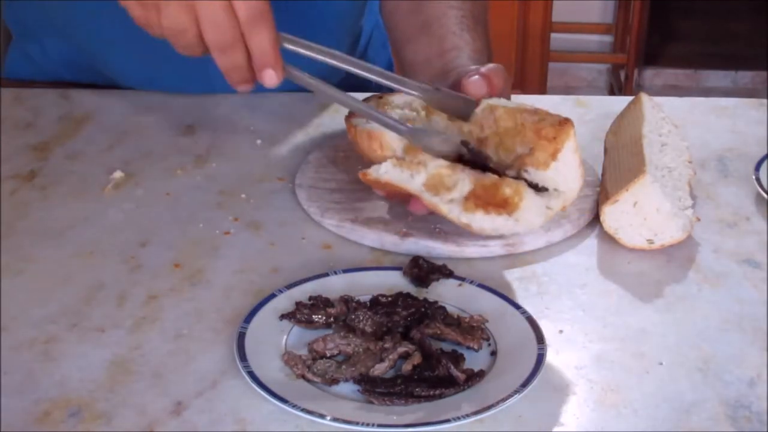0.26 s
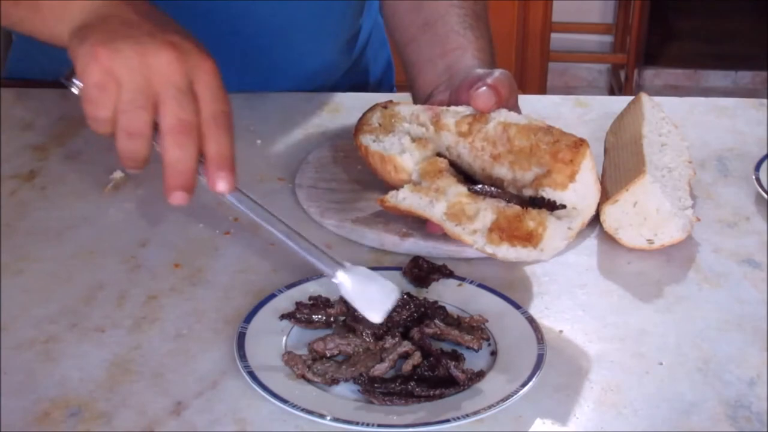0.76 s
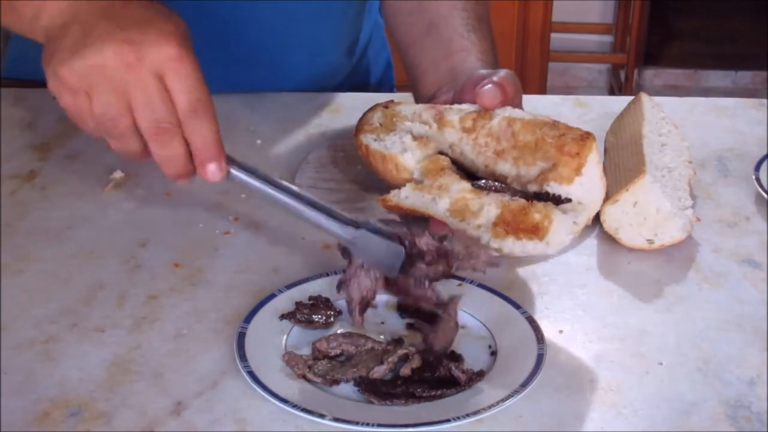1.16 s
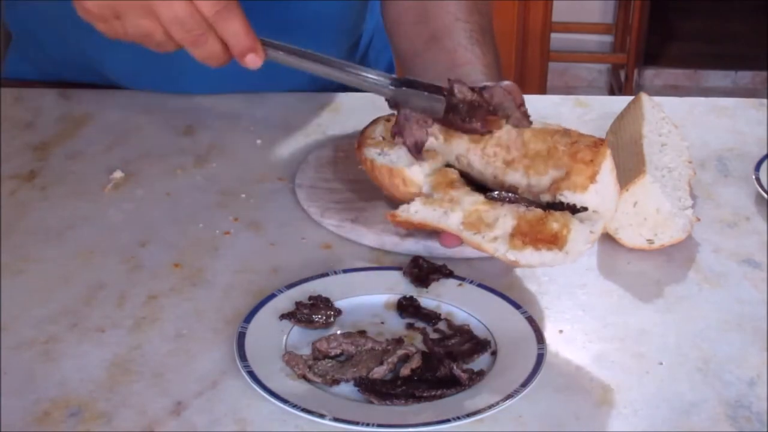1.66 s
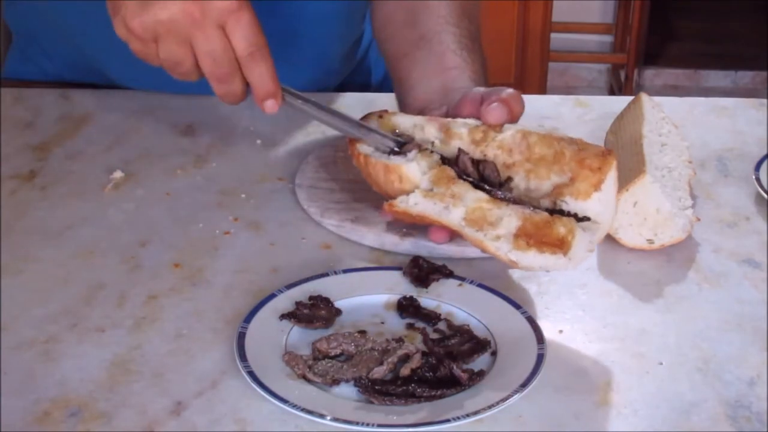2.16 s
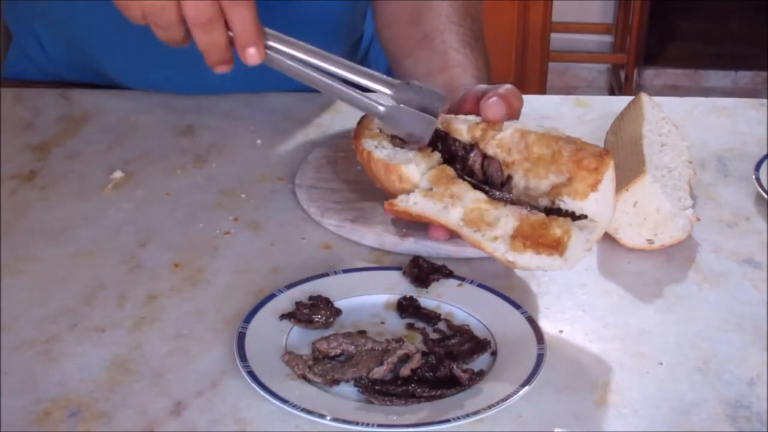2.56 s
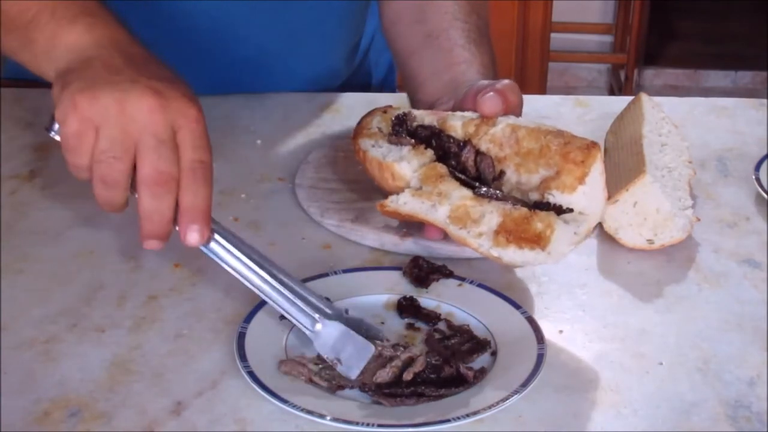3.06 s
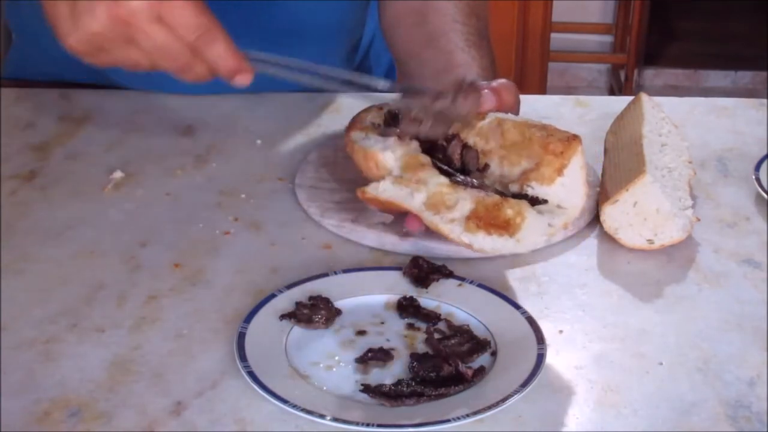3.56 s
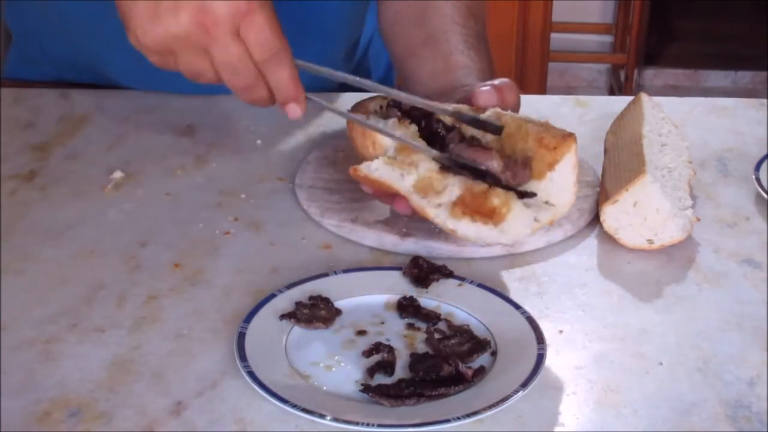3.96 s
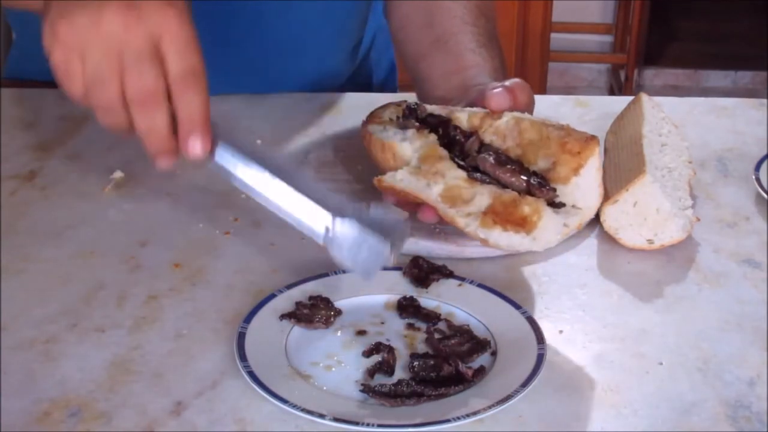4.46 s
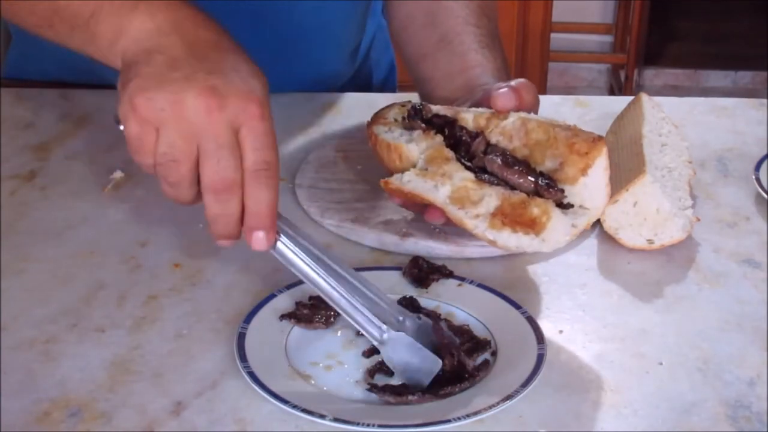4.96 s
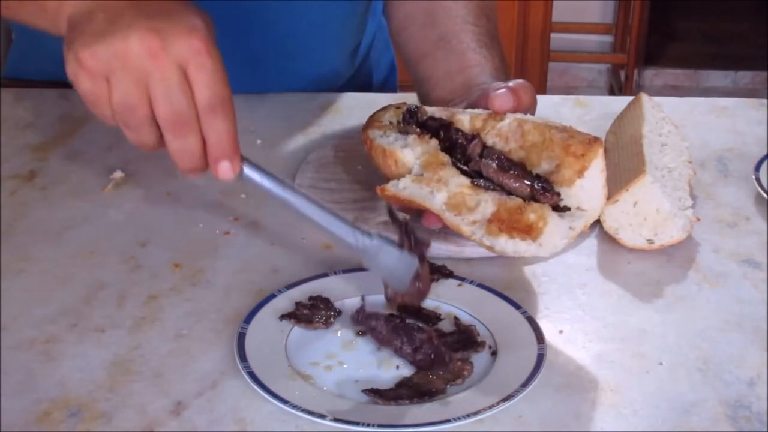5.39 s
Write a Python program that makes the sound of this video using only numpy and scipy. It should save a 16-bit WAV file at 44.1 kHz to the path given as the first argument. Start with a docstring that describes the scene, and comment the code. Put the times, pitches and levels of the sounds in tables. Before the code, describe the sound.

A quiet, hard-walled kitchen, heard close: a faint, slightly wavering appliance hum near 100 Hz and soft still air run throughout. From 0.15 to 0.4 s, tiny steel ticks accompany a soft grainy press into a bread roll. At 0.86 s the tongs clack shut, crisp and metallic, with a few quick weaker repeats, then very faint plate touches through meat at 1.15-1.3 s. Around 2.1-2.4 s comes a gentle crumb rustle with dull, barely audible knocks; thin ticks follow at 2.5 and 2.65 s. At 3.02 s the tongs strike the ceramic plate, the loudest moment: a bright, dense clatter juddering briefly, a tiny scrape, then from 3.18 s quickening, weakening tocks as the plate settles by 3.3 s. The short room tail fades. Near 4.1-4.25 s there are soft ticks, knocks and a brief press; faint plate touches at 5.0-5.17 s and last ticks at 5.3-5.4 s.

```python
"""First a hum and still air, a soft press into a bread roll and light ticks of steel tongs.
In a hard-walled kitchen the tongs clack shut, then strike a ceramic plate as meat is served.
Plate and tongs ring as dying sines over a noisy clack; after the strike the plate rocks to rest.
Ticks, knocks and touches are short rings and noises; presses and a scrape are swelling noise.
An appliance hums throughout as a few wavering tones."""
import sys
import numpy as np
from scipy import signal
from scipy.fft import rfft, irfft, next_fast_len
from scipy.io import wavfile
from scipy.ndimage import uniform_filter1d, map_coordinates

SR = 44100
rng = np.random.default_rng(int(sys.argv[2]) if len(sys.argv) > 2 else 0)


def dump_mix(stems):
    """Bounce the given channels to the path in sys.argv[1] as a 16-bit WAV at rate SR."""
    frames = np.atleast_2d(stems).T  # one column per channel
    limited = np.clip(frames, -1, 1)  # hard clip at full scale
    pcm = np.round(limited * 32767).astype(np.int16)
    wavfile.write(sys.argv[1], SR, pcm)


N = 248283
TIME = np.arange(N) / SR
RING_TIME = TIME[:SR * 2 // 5]  # the 0.4 s given to one short sound


# clacks of the tongs, alone or on the plate:
# (time [s], plate level [dB], tongs level [dB], clack level [dB], contact bandwidth [Hz])
TONGS_CLACKS = [(0.863, -41, -19.5, -20.5, 19000), (0.876, -43, -32, -30, 8000),
                (0.896, -50, -34.5, -33, 9000), (0.923, -56, -34.5, -39, 3380),
                (3.019, -19.5, -19, -17.5, 19000), (3.0234, -24.5, -19, -17.5, 4100),
                (3.035, -26.5, -31, -22.5, 17200), (3.053, -33, -44, -31, 17000),
                (3.07, -44, -29.5, -34, 6000), (3.126, -38, -33, -44, 3000)]


def clacks():
    """The tongs clack shut, then strike the plate; the plate's share of the ring differs each time."""
    out = np.zeros(N)
    for s, plate_db, tongs_db, clack_db, contact_hz in TONGS_CLACKS:
        add(out, s, contact(plate_db, tongs_db, clack_db, contact_hz))
    return out


# ring of the ceramic plate: (pitch [Hz], relative level [dB], time to fall 60 dB [s])
PLATE_RING = [(313, -24, .22), (1208, -9, .2), (1244, -10, .18), (1380, -19, .35), (1846, -11, .2),
              (2353, -12, .33), (2405, -9, .27), (2577, -3, .12), (2830, -3, .11), (2895, -5, .09),
              (3452, -5, .19), (3530, -9, .1), (3599, -6, .12), (4585, -20, .22), (5290, -15, .28),
              (5456, -10, .13), (6008, -7, .11), (6072, -3.5, .19), (6135, -13, .3), (6237, -6.5, .17),
              (6800, -12, .25), (6900, -10, .1), (7025, -6, .12), (8150, -13, .1), (8352, -9, .12),
              (8428, -6, .19), (8811, -7, .15), (8912, -8, .12), (8969, -6, .14), (9850, -10, .1),
              (11450, -9, .1), (11860, -16, .16), (12947, -12, .12), (13423, -7, .11), (13725, -10, .1),
              (13950, -5, .11), (14869, -14, .08)]
# ring of the steel arms: (pitch [Hz], relative level [dB], time to fall 60 dB [s])
TONGS_RING = [(271, -24, .2), (1225, -19, .14), (1345, -15, .14), (1580, -19, .15), (2116, -4, .15),
              (2204, -10, .15), (2275, -11, .12), (2302, -7, .26), (2805, -8, .13), (3690, -4, .17),
              (3742, -4, .17), (3830, -11, .12), (4485, -14, .12), (5262, -16, .14), (5345, -17, .22),
              (6202, -16, .12), (6554, -13, .11), (6955, -7, .08), (7049, -10, .12), (7590, -19, .11),
              (8420, -16, .12), (8495, -17, .18), (9450, -12, .1), (9960, -14, .09), (10078, -17, .1),
              (10218, -13, .1), (10562, -16, .11), (11900, -19, .1), (13330, -18, .1), (13509, -15, .1),
              (13604, -14, .1), (14480, -16, .09)]
# colour of the dense, quickly dying part of a clack: (pitch [Hz], relative level [dB per Hz])
CLACK_COLOUR = [(30, -60), (150, -46), (280, -28), (450, -1.5), (700, -6), (950, -5.5), (1350, 6),
                (1750, 1), (2000, 1), (2250, 18), (2500, 2), (2830, 11), (3150, -1), (3700, 11),
                (4200, -11), (5300, 3.5), (5900, 5.5), (6900, 9.5), (7900, -4), (9300, 5.5), (11000, -3.5),
                (12300, -3), (13500, 2), (15000, -4)]


def contact(plate_db, tongs_db, clack_db, contact_hz, clack_t60=0.095, grain_db=2.0, grain_per_s=450):
    """Plate and tongs both ring over a dense, crackly clack; a cushioned contact loses the treble."""
    grain = from_db(grain_db * drift(grain_per_s, RING_TIME))
    clack = from_db(clack_db) * noise(CLACK_COLOUR, len(RING_TIME)) * grain * decay(clack_t60)
    # stay safely below the highest pitch the sample rate allows
    cushion = signal.butter(2, min(contact_hz, SR * 9 / 20), fs=SR, output="sos")
    ringing = ring(PLATE_RING, plate_db) + ring(TONGS_RING, tongs_db)
    return signal.sosfilt(cushion, ringing + clack)


# low thud under each main clack: (time [s], level before rise and fade [dB])
LOW_THUDS = [(0.863, -37), (3.019, -32)]
# colour of the low thud: (pitch [Hz], relative level [dB per Hz])
THUD_COLOUR = [(120, -46), (250, -7), (310, 3), (400, -6), (680, 12), (1000, -14), (2000, -35)]
THUD_RISE_S, THUD_T60_S = 0.023, 0.25


def thuds():
    """A low noise under each main clack swells after it, then dies."""
    out = np.zeros(N)
    envelope = (1 - np.exp(-RING_TIME / THUD_RISE_S)) * decay(THUD_T60_S)
    for s, db in LOW_THUDS:
        add(out, s, from_db(db) * noise(THUD_COLOUR, len(RING_TIME)) * envelope)
    return out


# the skid after the tongs strike the plate; the slips come at random, SKID_PER_S a second on average
SKID_S, SKID_HELD_S, SKID_DB, SKID_FALL_DB_PER_S = 3.027, 0.085, -25, 152
SKID_PER_S, SKID_SPREAD_DB, SKID_CLACK_T60_S = 240, 13, 0.012


def skid():
    """The tips judder over the glaze: uneven small clacks that grow weaker."""
    size = len(RING_TIME)
    held = RING_TIME < SKID_HELD_S
    happens = rng.random(size) < SKID_PER_S / SR
    uneven = from_db(SKID_SPREAD_DB * rng.uniform(-1.2, 1, size))
    weakening = from_db(SKID_DB - SKID_FALL_DB_PER_S * RING_TIME)
    clack = noise(CLACK_COLOUR, size) * decay(SKID_CLACK_T60_S)
    out = np.zeros(N)
    add(out, SKID_S, signal.fftconvolve(happens * held * uneven * weakening, clack))
    return out


# tock of the plate's foot: (pitch [Hz], relative level [dB], time to fall 60 dB [s])
FOOT_RING = [(1240, -20.5, 0.19), (1380, -9.5, 0.047), (1500, -23, 0.24), (2386, 3, 0.045)]
# first fall of the foot, its level, first gap, each gap over the last, loss each time
ROCK_S, ROCK_DB, ROCK_GAP_S, ROCK_QUICKENING, ROCK_LOSS_DB = 3.182, -22, 0.051, 0.65, 10
# ring and clack against the tock; contact bandwidth
ROCK_RING_DB, ROCK_CLACK_DB, ROCK_HZ = -21, -10.5, 3540
ROCK_ATTACK_S = 0.0011


def rocking():
    """The tipped plate drops and rocks to rest; its foot tocks and it rings; returns (ring, tocks)."""
    rings, tocks = np.zeros((2, N))
    for delay, fade_db in bounces(ROCK_GAP_S, ROCK_QUICKENING, ROCK_LOSS_DB, count=4):
        db = ROCK_DB + fade_db
        # the tongs stay silent here
        add(rings, ROCK_S + delay, contact(db + ROCK_RING_DB, -np.inf, db + ROCK_CLACK_DB, ROCK_HZ))
        add(tocks, ROCK_S + delay, ring(FOOT_RING, db) * (1 - np.exp(-RING_TIME / ROCK_ATTACK_S)))
    return rings, tocks


def bounces(gap_s, ratio, loss_db, count):
    """A run of contacts as (delay s, dB): each gap is `ratio` times the last, each contact weaker."""
    return [(gap_s * np.sum(ratio ** np.arange(k)), -loss_db * k) for k in range(count)]


# tips reach the plate through the meat:
# (time [s], level at the main pitch [dB], main pitch [Hz], loss one octave away [dB])
PLATE_TOUCHES = [(1.144, -52, 2280, 28), (1.196, -51, 2300, 30), (1.197, -42, 4600, 220),
                 (1.198, -55.5, 7500, 14), (1.322, -49, 3000, 6), (5.005, -58.5, 2300, 23),
                 (5.166, -40.5, 4840, 220), (5.171, -52, 3000, 13)]


def touches(lasting_db=5.0, usual_t60=0.2):
    """A cushioned touch wakes the plate's longest modes, mostly near one pitch."""
    out = np.zeros(N)
    hz, _, t60 = np.transpose(PLATE_RING)
    favour_db = lasting_db * np.log2(t60 / usual_t60)
    for s, db, main_hz, focus_db in PLATE_TOUCHES:
        loss_db = focus_db * np.log2(hz / main_hz) ** 2
        add(out, s, ring(PLATE_RING, db + favour_db - loss_db))
    return out


# where the scrape sings: (pitch [Hz], width [Hz], relative level [dB])
SCRAPE_RESONANCES = [(1394, 130, -2), (3800, 130, -2), (4610, 130, 1), (6500, 700, -5), (12900, 3000, -14)]
SCRAPE_S, SCRAPE_HELD_S, SCRAPE_DB = 3.155, 0.043, -49
SCRAPE_RISE_DB_PER_S, SCRAPE_FALL_DB_PER_S = 500, 350


def scrape():
    """A steel tip slides over the glaze: friction noise sings in a few resonances."""
    out = 0
    for hz, width_hz, db in SCRAPE_RESONANCES:
        edges = [hz - width_hz / 2, hz + width_hz / 2]
        band = signal.butter(2, edges, "band", fs=SR, output="sos")
        out = out + from_db(db) * rms_one(signal.sosfilt(band, rng.standard_normal(N)))
    return out * swell(SCRAPE_S, SCRAPE_HELD_S, SCRAPE_DB, SCRAPE_RISE_DB_PER_S, SCRAPE_FALL_DB_PER_S)


# arms flexing at the hinge:
# (time [s], level [dB], main pitch [Hz], thin top relative to that level [dB])
HINGE_TICKS = [(.15, -60, 3300, -15), (.215, -54, 3400, -15), (.229, -55, 7800, -12),
               (.318, -55.5, 5600, 3), (.355, -54, 4900, 2), (.376, -58, 5040, 7.5), (.989, -47, 8000, 6),
               (2.476, -56, 11000, -2), (2.493, -52.5, 9360, -1), (2.651, -52.5, 8300, -9),
               (2.672, -50.5, 7000, -3), (4.103, -54, 4800, -4), (4.178, -55, 4300, 2.5),
               (5.296, -52, 8600, -13), (5.388, -58, 9000, -6)]
TICK_TOP_HZ = 12800  # every tick also has a thin top


def ticks():
    """The hinge ticks as the grip changes."""
    out = np.zeros(N)
    for s, db, main_hz, top_db in HINGE_TICKS:
        add(out, s, tick(db, main_hz) + tick(db + top_db, TICK_TOP_HZ))
    return out


# ring of the hinge end of the tongs:
# (pitch [Hz], relative level [dB], time to fall 60 dB [s])
HINGE_RING = [(2630, -4, .15), (3714, -5, .26), (5120, -1, 0.15), (6560, 0.5, .08), (7600, -2, .05),
              (8300, -1, 0.096), (8600, -7, 0.066), (10050, -21, .045), (12950, -4, .07), (13450, -7, .063)]


def tick(db, main_hz, focus_db=20.0, snap_db=-2.5, snap_t60=0.06, rise_s=0.0022):
    """A gritty slip wakes thin steel; modes fade with their distance in octaves from the main pitch."""
    octaves = np.log2(np.array(HINGE_RING)[:, 0] / main_hz)
    snap = from_db(db + snap_db) * band_noise(main_hz, skirt_db=-8.0) * decay(snap_t60)
    # the table's level column is added inside ring()
    steel = ring(HINGE_RING, db - focus_db * octaves ** 2, flutter=0.6)
    return (snap + steel) * (1 - np.exp(-RING_TIME / rise_s))


# dull knocks: the plate wobbling on the table, the roll pressed, perhaps a wooden board:
# (time [s], level before the room mix [dB], pitch [Hz])
DULL_KNOCKS = [(2.237, -50.5, 294), (2.332, -54.5, 328), (3.032, -36, 682), (3.054, -29, 1130),
               (3.073, -40.5, 610), (3.131, -40, 1205), (3.133, -46.5, 684), (3.205, -42, 1450),
               (3.245, -50, 1350), (4.181, -48.5, 1330), (4.211, -50, 262), (4.215, -52, 1400),
               (4.25, -52, 847)]
KNOCK_CYCLES, KNOCK_ROUGHNESS = 66, 0.26  # cycles to fall 60 dB; 0 is a clean tone, 1 all noise


def knocks():
    """Dull knocks, the lower the longer."""
    out = np.zeros(N)
    for s, db, hz in DULL_KNOCKS:
        add(out, s, resonance(db, hz, KNOCK_CYCLES / hz, KNOCK_ROUGHNESS))
    return out


def resonance(db, hz, t60, roughness):
    """One heavily damped resonance: a clean tone when hard, a rough thud when soft."""
    rough = np.clip(roughness, 0, 1)
    tone = np.sqrt(2 - 2 * rough ** 2) * np.sin(2 * np.pi * hz * RING_TIME)
    thud = rough * band_noise(hz, skirt_db=-15.0)
    return from_db(db) * (tone + thud) * decay(t60)


# meat is pushed into the crumb: (time [s], held for [s], level [dB])
CRUMB_PUSHES = [(.14, 0.16, -59), (2.13, 0.23, -56), (4.17, 0.052, -55.5)]
# colour of the soft rubbing hiss: (pitch [Hz], relative level [dB per Hz])
RUBBING_COLOUR = [(150, -12), (300, 10), (700, -3.5), (1500, -3.5), (2800, -4), (4000, -8.5), (5000, -9.5),
                  (14000, -21.5)]
PUSH_RISE_DB_PER_S, PUSH_FALL_DB_PER_S = 62, 82


def rubbing(grain_db=1.0):
    """Each push swells, holds and fades; crumbs catch and let go, so the soft hiss is grainy."""
    pressure = sum(swell(s, held, db, PUSH_RISE_DB_PER_S, PUSH_FALL_DB_PER_S)
                   for s, held, db in CRUMB_PUSHES)
    return pressure * from_db(grain_db * drift(120)) * noise(RUBBING_COLOUR, N)


# appliance motor and mains: (pitch [Hz], typical level [dB rms], spread of the pitch waver [Hz])
HUM_TONES = [(98.5, -59, 0.38), (95.4, -72.5, 0.93), (194.5, -73, 1.82), (357.3, -68, 3.94),
             (541.4, -62, 2.25), (640, -72.5, 1.41)]


def hum(throb_db=2.0):
    """Steady tones wander a little in pitch and level; the two lowest lie close enough to beat."""
    out = np.zeros(N)
    for hz, db, waver_hz in HUM_TONES:
        turns = np.cumsum(hz + waver_hz * drift(14)) / SR + rng.random()
        level = np.sqrt(2) * from_db(db + throb_db * drift(4.806))  # a sine's peak is root 2 times its rms
        out += level * np.sin(2 * np.pi * turns)
    return out


# colour of the still air: (pitch [Hz], relative level [dB per Hz])
AIR_COLOUR = [(25, -13), (45, -15), (70, -13), (110, -5), (160, -9.5), (300, -5.5), (480, -8.5), (650, -7),
              (1100, -11), (2000, -15), (4000, -19.5), (9800, -22), (15000, -30.5)]
AIR_DB = -54.5  # rms


def still_air():
    """A steady, soft noise, strongest in the low range."""
    return from_db(AIR_DB) * noise(AIR_COLOUR, N)


def from_db(db):
    """Decibels to gain."""
    return 10 ** (np.asarray(db) / 20)


def rms_one(x):
    """Scale to unit power."""
    return x / np.sqrt(np.mean(x ** 2) + 1e-20)


def at_hz(points, hz):
    """Read a table along log frequency."""
    known_hz, values = np.transpose(points)
    return np.interp(np.log(np.maximum(hz, 1)), np.log(known_hz), values)


def noise(spectrum, size):
    """Noise of a given colour, rms 1."""
    fast_size = next_fast_len(size)
    gain = from_db(at_hz(spectrum, np.fft.rfftfreq(fast_size, 1 / SR)))
    white = rfft(rng.standard_normal(fast_size))
    return rms_one(irfft(white * gain, fast_size)[:size])


def band_noise(hz, skirt_db):
    """Short noise that peaks at one pitch and changes by skirt_db an octave, up to three octaves away."""
    return noise([(hz / 8, 3 * skirt_db), (hz, 0), (hz * 8, 3 * skirt_db)], len(RING_TIME))


def drift(rate, time=TIME):
    """Smooth chance with a spread of about 1 that changes `rate` times a second."""
    return map_coordinates(rng.standard_normal(1024), [time * rate], order=3, mode="wrap")


def decay(t60):
    """Envelope that loses 60 dB in t60 seconds."""
    return np.exp(-np.log(1000) * RING_TIME / t60)


def swell(s, held, db, rise_db_per_s, fall_db_per_s):
    """Gain that rises until time s, holds and falls."""
    below_db = rise_db_per_s * np.maximum(s - TIME, 0) + fall_db_per_s * np.maximum(TIME - s - held, 0)
    return from_db(db - below_db)


def ring(modes, gain_db, flutter=0.42, flutter_per_s=130):
    """Struck modes: dying sines, each fluttering in strength and phase."""
    hz, mode_db, t60 = np.transpose(modes)
    out = 0
    for f, db, t in zip(hz, mode_db + gain_db, t60):
        along, across = (flutter * np.interp(RING_TIME * flutter_per_s, np.arange(len(k)), k)
                         for k in rng.standard_normal(size=(2, 128)))
        turn = 2 * np.pi * f * RING_TIME
        wave = (1 + along) * np.sin(turn) + across * np.cos(turn)
        out = out + rng.choice([-1, 1]) * from_db(db) * decay(t) * wave
    return out


def add(track, s, sound):
    """Mix a sound into the track at time s."""
    start = round(s * SR)
    track[start:start + len(sound)] += sound[:N - start]


# how long the room rings: (pitch [Hz], time to fall 60 dB [s])
ROOM_DECAY = [(200, 0.45), (1400, 0.35), (3700, 0.38), (9000, 0.3), (15000, 0.27)]


def kitchen(x, direct_db=5.0, table_db=0.0, table_t60=0.028):
    """Direct sound, close scatter off the stone table, then a tail whose treble dies first."""
    size = len(RING_TIME)
    hz = np.fft.rfftfreq(size, 1 / SR)
    white = rfft(rng.standard_normal(size))
    edges = np.geomspace(60, SR / 2, 13)
    # each band of the tail dies at its own speed
    tail = sum(irfft(white * (hz >= low) * (hz < high), size) * decay(at_hz(ROOM_DECAY, np.sqrt(low * high)))
               for low, high in zip(edges, edges[1:]))
    scatter = rng.standard_normal(size) * decay(table_t60)
    response = tail / np.linalg.norm(tail) + from_db(table_db) * scatter / np.linalg.norm(scatter)
    response[0] += from_db(direct_db)
    # the room smears the sound in time but favours no pitch: only a fine ripple stays
    transfer = rfft(response, 2 * size)
    transfer /= np.sqrt(uniform_filter1d(np.abs(transfer) ** 2, size=12))
    return signal.fftconvolve(x, irfft(transfer)[:size])[:N]


def scene(knock_room_db=-1.5, knock_direct_db=-6.5, lowest_hz=200):
    """Serving sounds in the room, over hum and still air; knocks come across drier than clacks."""
    plate_ring, tocks = rocking()
    knock = knocks() + tocks
    others = clacks() + thuds() + skid() + plate_ring + touches() + scrape() + ticks()
    serving = kitchen(others + from_db(knock_room_db) * knock) + from_db(knock_direct_db) * knock
    # things this small radiate little bass
    serving = signal.sosfilt(signal.butter(3, lowest_hz, "high", fs=SR, output="sos"), serving)
    return (serving + rubbing() + hum() + still_air())[None]


# brief level changes; the treble always dips, the middle may dip or lift:
# (time [s], middle change [dB], treble change [dB])
LEVEL_DIPS = [(1.625, 1, -3), (1.81, -3, -6), (1.947, 3, -1), (2.69, 2, -9.5), (2.838, 4, -8),
              (3.116, -13, -3.5), (3.264, -3, -1), (3.415, 0, -4), (3.669, 0, -8), (3.80, -4, -6.5),
              (3.86, -1, -3), (3.949, -1, -8), (4.556, 1, -1), (4.885, 1, -16), (5.16, -1, -4.5)]
DIP_WIDTH_S = 0.0077  # from the centre to where the change in dB has shrunk to 37 %
DIP_MIDDLE_HZ, DIP_TREBLE_HZ = 220, 1800  # where middle and treble begin
CUTOFF_HZ = 15150


def record(dry, top=1.0):
    """Above the bass the level changes briefly now and then; peaks are rounded and the top is cut."""
    bass, below_treble = (signal.sosfiltfilt(signal.butter(4, hz, fs=SR, output="sos"), dry)
                          for hz in (DIP_MIDDLE_HZ, DIP_TREBLE_HZ))
    s, middle_db, treble_db = np.transpose(LEVEL_DIPS)
    shapes = np.exp(-((TIME - s[:, None]) / DIP_WIDTH_S) ** 2)
    middle = from_db(middle_db @ shapes) * (below_treble - bass)
    treble = from_db(treble_db @ shapes) * (dry - below_treble)
    rounded = top * np.tanh((bass + middle + treble) / top)
    return signal.sosfilt(signal.ellip(12, 0.1, 80, CUTOFF_HZ, fs=SR, output="sos"), rounded)


dry = scene()
out = record(dry)
dump_mix(out)
```